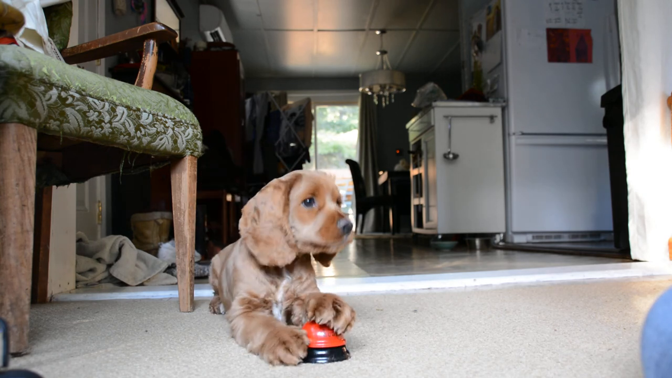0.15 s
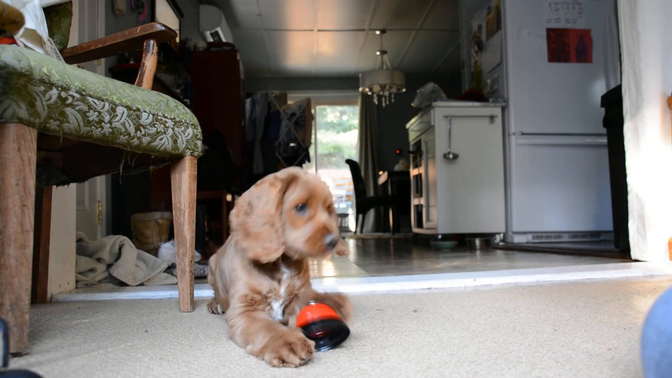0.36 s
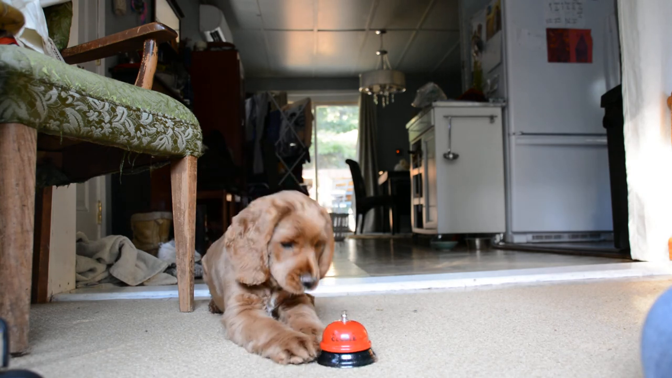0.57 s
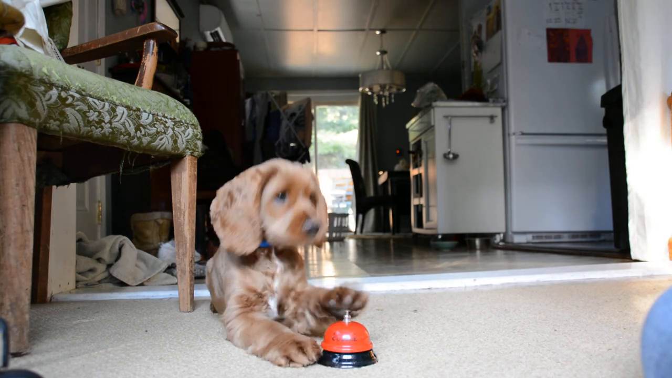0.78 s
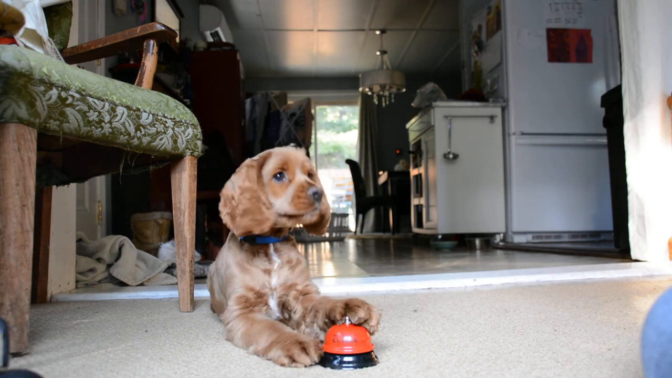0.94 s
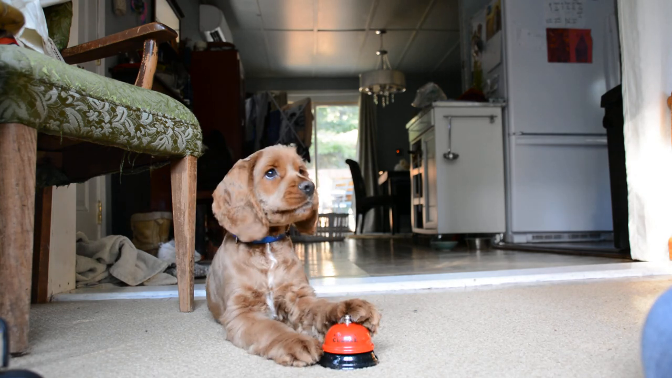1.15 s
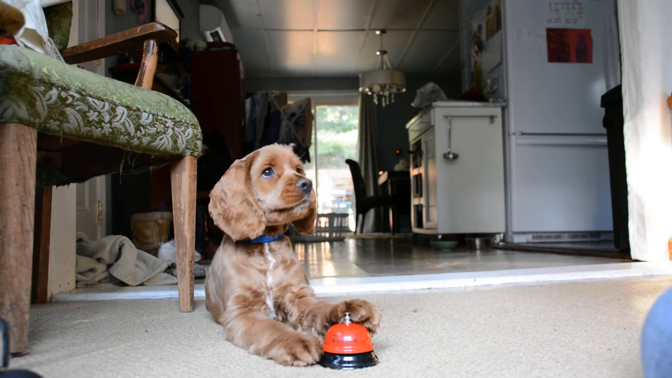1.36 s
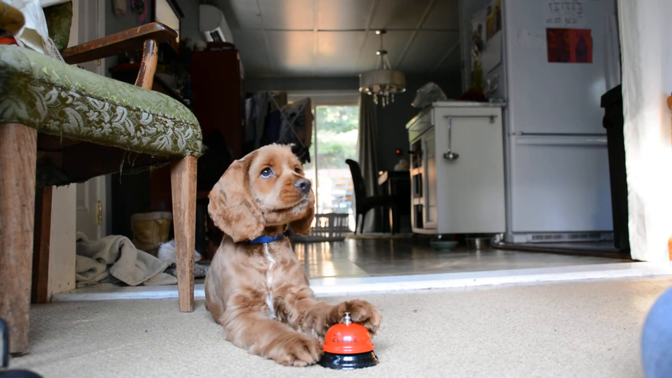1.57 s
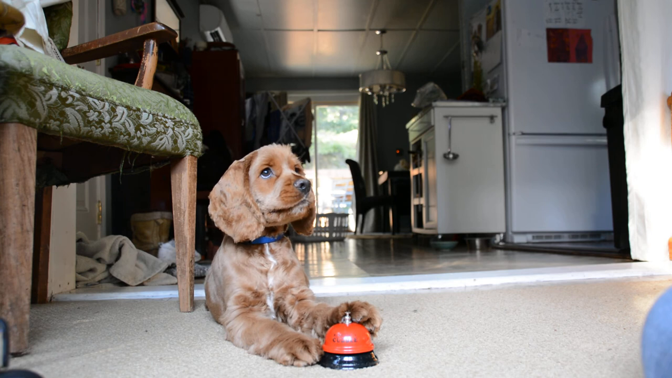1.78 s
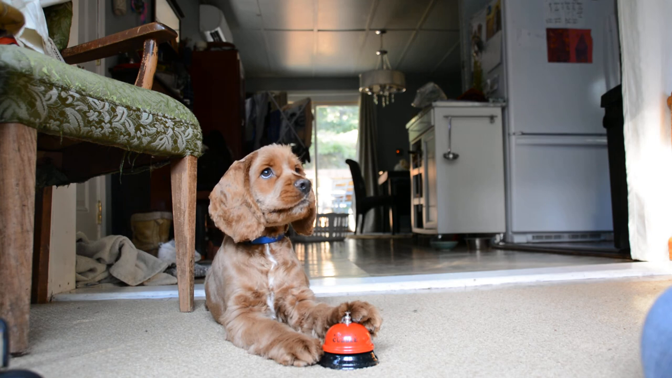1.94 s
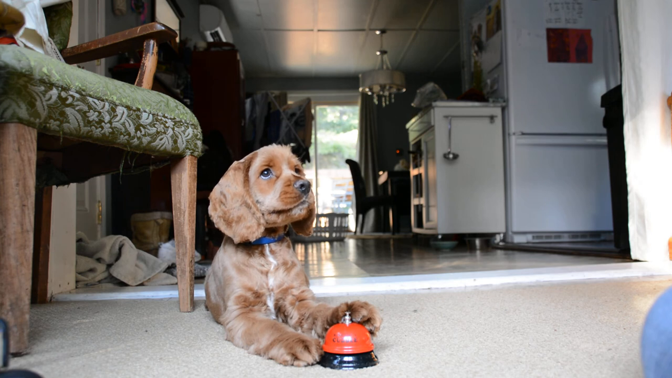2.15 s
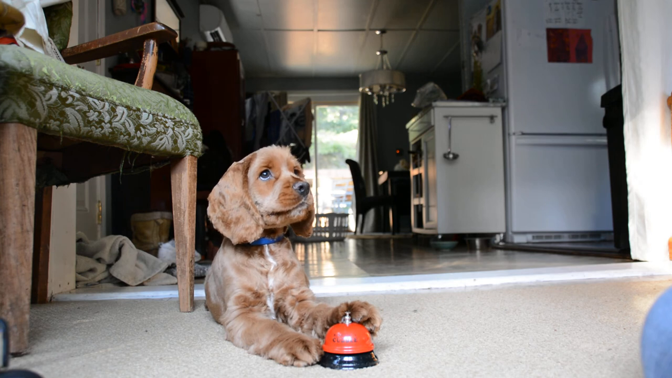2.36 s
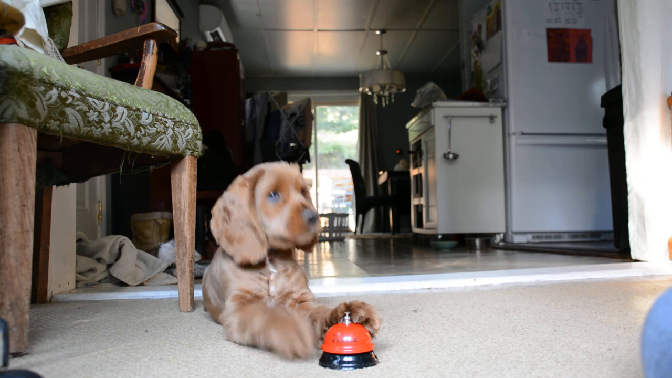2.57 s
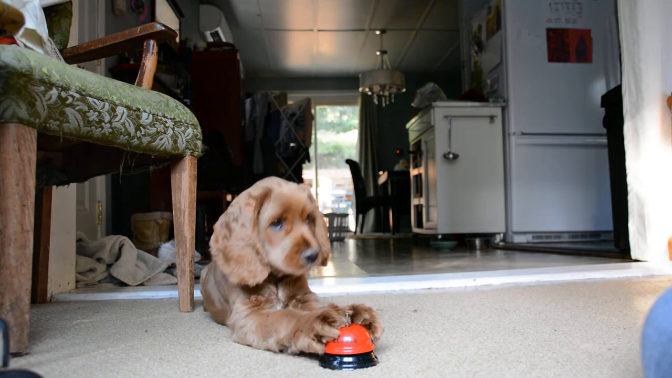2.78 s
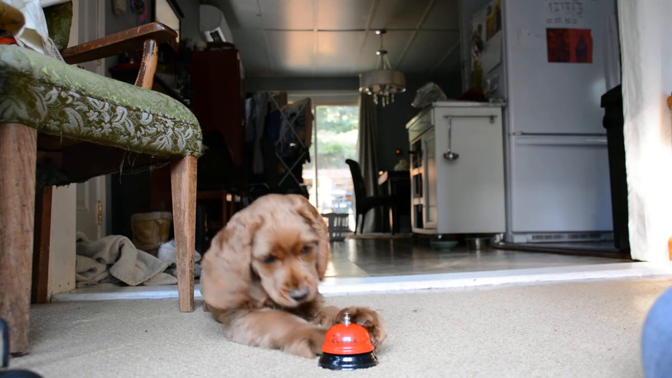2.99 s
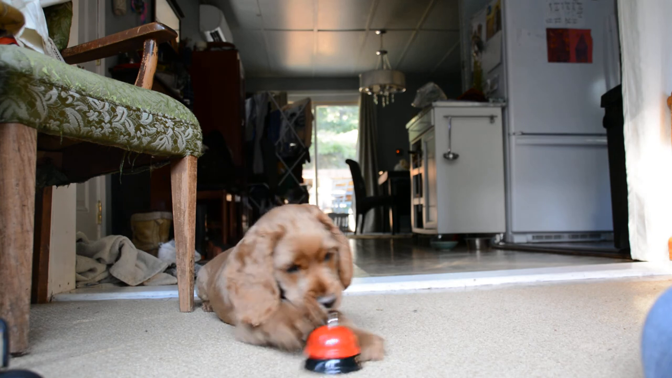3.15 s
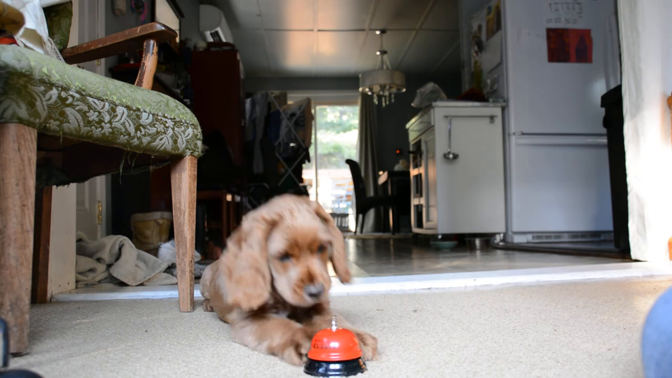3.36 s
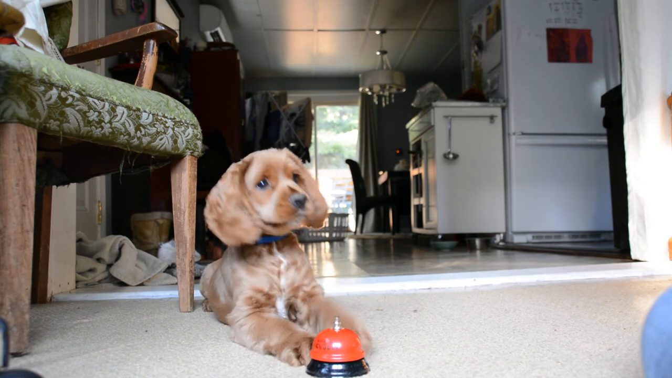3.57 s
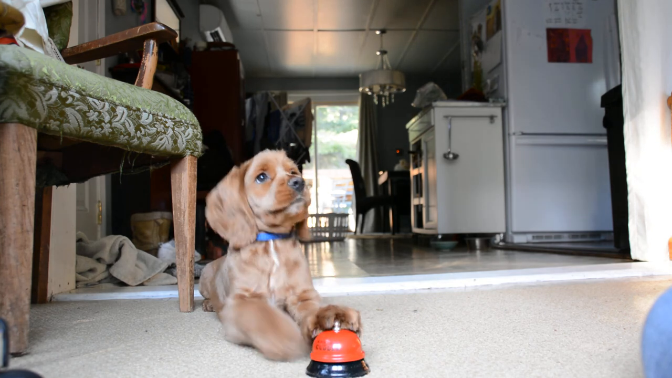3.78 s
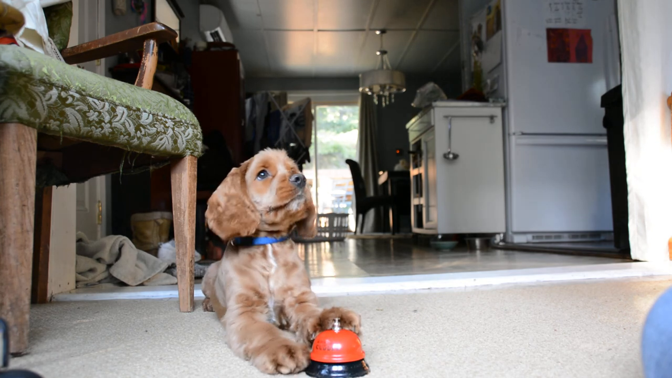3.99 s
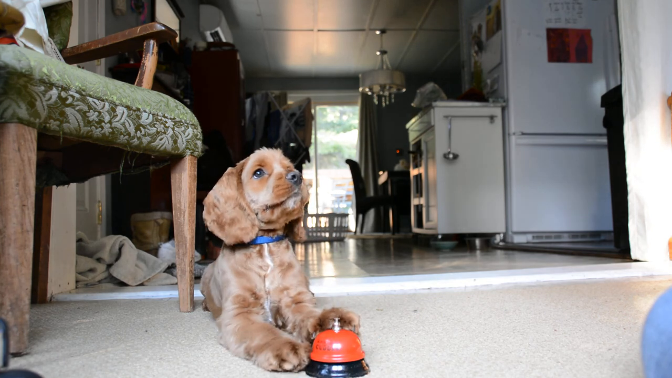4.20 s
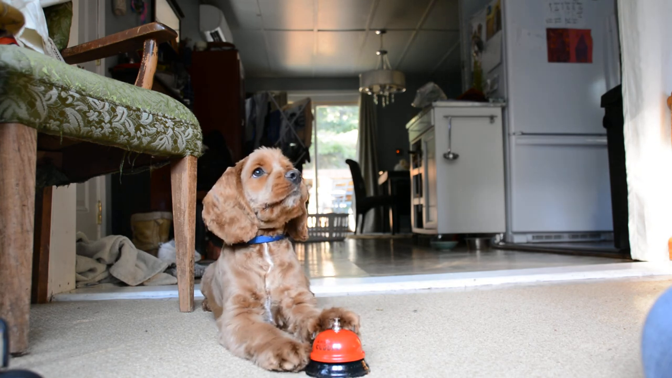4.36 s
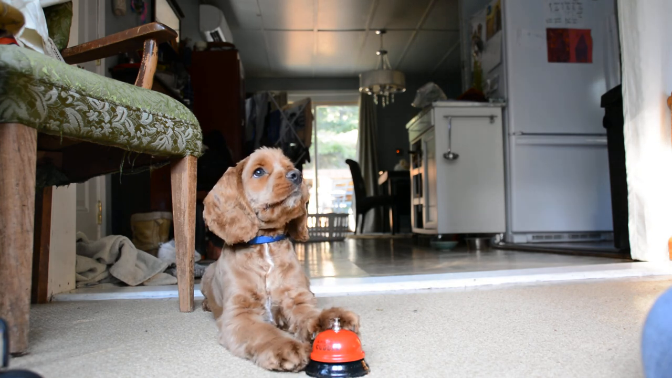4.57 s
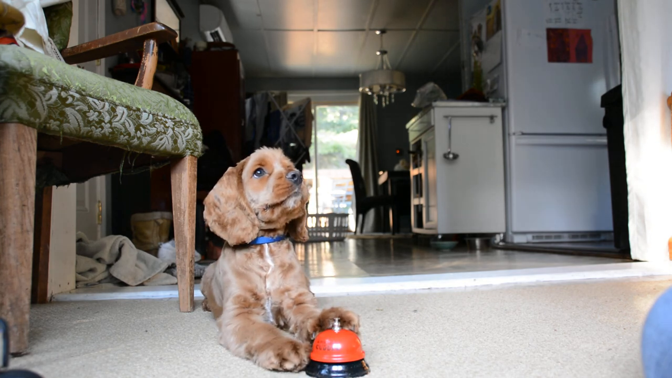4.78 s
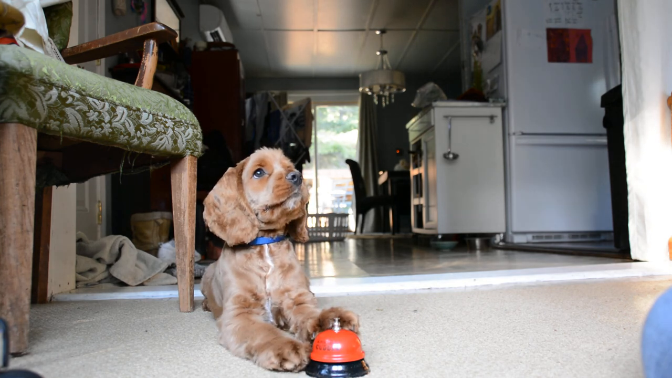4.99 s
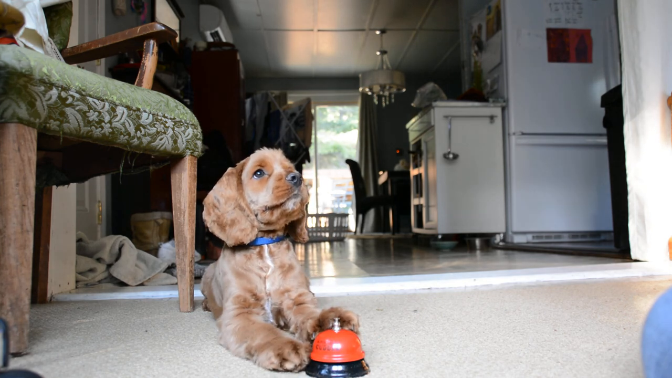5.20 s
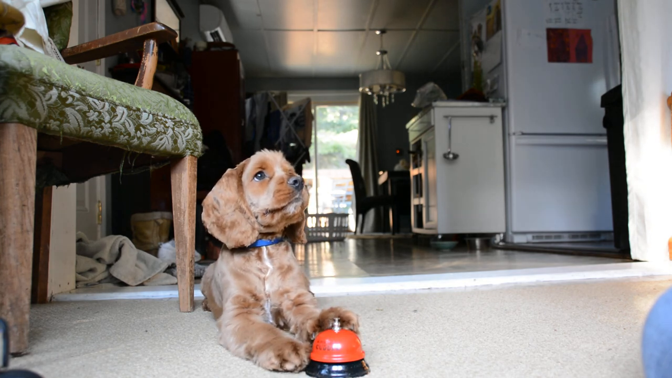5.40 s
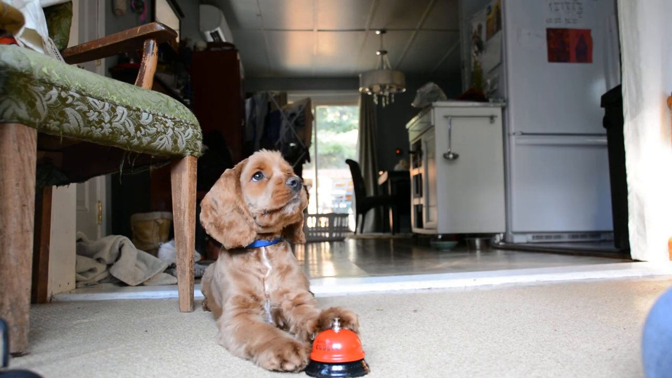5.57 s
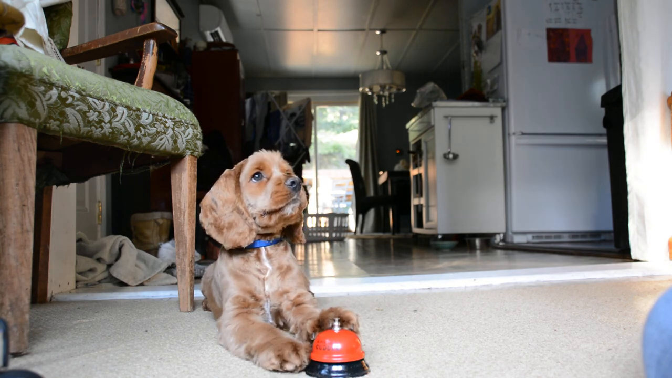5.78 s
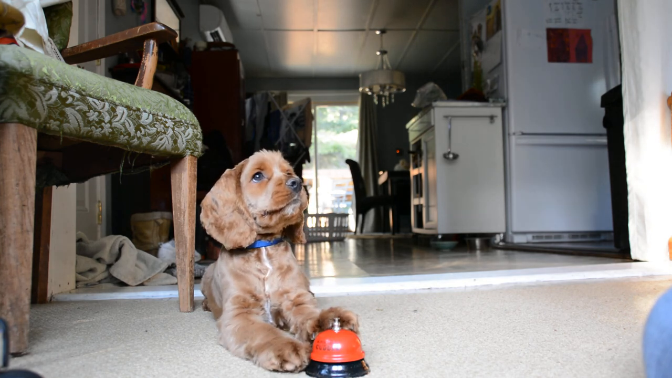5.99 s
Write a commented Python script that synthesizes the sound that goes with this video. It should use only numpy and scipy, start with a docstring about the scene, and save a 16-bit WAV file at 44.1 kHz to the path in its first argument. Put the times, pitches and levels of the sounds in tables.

```python
"""A steel desk bell on a carpet, pawed by a puppy close to the microphone: the clapper strikes short dings, pairs of
beating dome modes that the paw soon damps. Claws tap and scrape, as noise bursts through the bell's resonances
with a brushed dome and singing loose parts; the base thuds on the floor, as impulses that sweep downward.
Furniture echoes and a short room tail surround it, over steady filtered hiss and a narrow hum."""
import sys
import numpy as np
from scipy import signal
from scipy.fft import rfft, irfft, next_fast_len
from scipy.io import wavfile
from scipy.ndimage import uniform_filter1d, map_coordinates

SR = 44100
rng = np.random.default_rng(int(sys.argv[2]) if len(sys.argv) > 2 else 0)


def transcribe(u):
    """Save the signal u as a 16-bit wav file named by the first command-line argument.

    u: samples, shape (n,) or (channels, n), limited to [-1, 1]; the rate is SR.
    q: integer samples, one column per channel.
    """
    v = np.clip(np.atleast_2d(u).T, -1, 1)
    q = np.round(v * 32767).astype(np.int16)
    wavfile.write(sys.argv[1], SR, q)


N = 266343

# edges of the four bands of a contact, knock, shell, stem and treble: (f/Hz)
ZONES = [300, 2300, 3350, 5400, 16000]


def dings():
    """Each clapper blow sets the dome pairs ringing, together with a short crack and the jangle of the loose parts."""
    # clapper strikes: (t/s, crack level/dB, upper partner level/dB x5, left over right/dB,
    # t60 of the paw's damping/s, time until pressed/s)
    strikes = [(0.849, -16.5, -31, -32, -23.5, -8, -38, 1.5, 0.45, .5),
               (3.387, -36, -47.5, -43.5, -51, -43, -56, 2.5, 2.5, .335),
               (3.749, -18, -22, -21, -24, -9.5, -41, .7, 0.2, .5)]
    # per strike, strength of each pair's lower partner against the upper, set by where the rim is hit:
    # (signed ratio x5)
    partners = [(-.65, .6, -.55, .3, 8), (-.5, .45, -.1, 2, 3), (-.3, .35, 2.2, .8, 10)]
    t = np.arange(SR // 2) / SR
    bell, crack = np.zeros((2, N + SR)), np.zeros(N + SR)
    for (s, crack_db, *levels_db, pan_db, held_t60, free_s), lower in zip(strikes, partners):
        start = round(s * SR)
        blow = ring(levels_db, lower, held_t60, free_s)
        bell[:, start:start + len(t)] += amp([[pan_db / 2], [-pan_db / 2]]) * blow
        # a 10 ms crack together with a weaker 140 ms jangle
        crack[start:start + len(t)] += amp(crack_db - 60 * t / 0.01)
        crack[start:start + len(t)] += amp(crack_db - 7.5 - 60 * t / 0.14)
    # (f/Hz, relative level/dB)
    colour = [(200, -19), (1000, -1.5), (3000, -2), (3700, -1.5), (4050, -4.0), (4550, 1), (5200, -7.0),
              (7400, 0), (8500, -3.5), (10700, -0.5), (13500, -21), (16000, -21), (20000, -63.5)]
    response = lambda f: causal(amp(along(colour, f)) * (1 + 1.5 * modes(f)))
    jangle = filtered(crack[:N] * rng.standard_normal(N), response)
    return bell[:, :N] + jangle


def ring(levels_db, lower, held_t60, free_s):
    """The five pairs of the dome, dying by their own loss plus the paw's, until a press stops them."""
    # dome modes come in split pairs that beat: (lower f/Hz, upper f/Hz)
    dome = [(1072, 1087), (3051, 3084), (5945, 5981), (9427, 9466), (12875, 12918)]
    # decay of each pair with nothing touching the dome: (t60/s)
    free_t60 = [1.6, 1.78, .8, .33, 0.19]
    # the high pairs slip past the pads: (share of the paw's damping that each pair feels)
    grips = [1.01, .99, .9, .55, .3]
    t = np.arange(min(SR // 2, round((free_s + .05) * SR))) / SR
    out = 0
    for (low_hz, high_hz), t60, grip, db, share in zip(dome, free_t60, grips, levels_db, lower):
        pair = np.sin(2 * np.pi * high_hz * t) + share * np.sin(2 * np.pi * low_hz * t)
        out = out + amp(db - 60 * t * (1 / t60 + grip / held_t60)) * pair
    onset = 1 - np.exp(-t / .0015)
    press = amp(-60 * np.maximum(t - free_s, 0) / .03)
    return np.pad(out * onset * press, (0, SR // 2 - len(t)))


def contacts():
    """Taps and dragging shake the body zone by zone, thud on the floor and brush the dome."""
    shakes, tones = taps()
    scrape, treble = skids()
    thuds = floor_thuds(scrape)
    rattle = body_rattle(shakes + [scrape, scrape, scrape, treble])
    return tones + thuds + rattle


def taps():
    """Pads and claws strike: noise envelopes for the four zones, and tones of the dome and loose parts."""
    # paw and claw contacts: (t/s, pad knock level/dB, claw tick level/dB, low three dome pairs level/dB,
    # high two level/dB, both before the brush offsets, singing loose part f/Hz, its level/dB)
    hits = [(0.214, -52, -65, -90, -72, 2600, -64), (0.262, -40, -42.5, -43, -48, 3044, -55),
            (0.332, -36, -38, -39.5, -42, 2000, -53), (0.379, -48, -44, -58, -52, 4100, -45),
            (0.425, -27, -33, -45, -51, 2780, -36), (0.43, -40, -45, -60, -60, 4180, -39),
            (0.472, -58, -55, -60, -50, 7590, -47), (0.519, -40, -43, -53, -57, 1750, -54),
            (0.55, -39, -41, -51, -44, 2700, -36), (0.563, -48, -50, -57, -46, 7590, -41.5),
            (0.609, -49, -56, -70, -55, 2900, -54), (0.806, -39, -56, -65, -71, 4190, -55),
            (0.832, -42.5, -57.5, -62, -77, 3180, -58), (1.076, -52, -79.5, -69, -70, 1780, -70),
            (1.106, -48, -73, -85, -69.5, 4200, -72), (1.176, -57, -62, -79, -77, 4000, -59),
            (1.199, -42, -52, -69, -52, 3650, -43), (2.539, -53, -81, -92, -88.5, 1510, -63),
            (2.663, -55, -60, -76, -84, 4290, -58.5), (2.831, -69.5, -63, -75, -78, 4200, -69.5),
            (2.847, -57.5, -63, -75, -78, 2120, -71), (2.883, -61, -63, -72, -80, 4270, -64),
            (2.965, -57, -54, -54.5, -52.5, 9190, -67), (2.98, -33.5, -42, -55, -46, 4070, -45),
            (3.088, -45, -60, -68, -48, 1740, -66), (3.099, -40, -53, -68, -70, 4180, -47),
            (3.134, -37, -38, -56, -34.5, 3060, -47), (3.165, -36, -43, -58, -52, 2810, -33),
            (3.179, -34, -38, -59, -47, 4070, -35), (3.205, -43, -30, -28, -29, 2920, -27),
            (3.215, -56, -50, -60, -60, 4070, -33.5), (3.248, -43.5, -48, -60, -40, 4040, -31),
            (3.365, -44, -50, -57, -63, 4200, -41.5), (3.37, -50, -60, -70, -70, 2940, -41),
            (3.413, -39, -46, -58, -49, 2790, -50.5), (3.721, -42, -53, -85, -69, 1585, -48),
            (3.734, -48, -64, -87, -71, 1380, -59), (3.896, -40.5, -43.5, -78.5, -40, 3630, -39)]
    # what a brushing paw draws from each dome pair: (offset/dB)
    brush_offsets = [-13, -11.5, 0, -1, -21]
    rattle_t60, brush_t60, part_t60 = .062, .26, .21  # s; the middle one is the paw's damping of the dome
    t = np.arange(SR // 2) / SR
    shakes, tones = np.zeros((4, N + SR)), np.zeros(N + SR)
    rise = 1 - np.exp(-t / 0.001036)  # a padded paw loads the bell over a moment
    shape = (amp(-60 * t / rattle_t60) + .3 * amp(-60 * t / 0.0077)) * rise
    spots = rng.uniform(-1, 1, (len(hits), 5))
    for (s, knock_db, claw_db, low_db, high_db, part_hz, part_db), spot in zip(hits, spots):
        start = round(s * SR)
        # a knock also shakes shell and stem; a singing part rattles in its own zone
        shake = amp([knock_db, knock_db - 12, knock_db - 9.5, claw_db])
        shake[np.searchsorted(ZONES, part_hz) - 1] += amp(part_db + 1.5)
        shakes[:, start:start + len(t)] += shake[:, None] * shape
        levels_db = np.repeat([low_db, high_db], repeats=(3, 2)) + brush_offsets
        brushed = ring(levels_db, spot, brush_t60, free_s=0.11)
        # the part beats at its own random rate, up to 30 Hz
        beat = 1 + .5 * np.cos(2 * np.pi * 30 * spot[0] * t)
        part = amp(part_db - 60 * t / part_t60) * rise * np.sin(2 * np.pi * part_hz * t) * beat
        tones[start:start + len(t)] += brushed + part
    return shakes[:, :N], tones[:N]


def skids():
    """The paw drags the bell: scrape and treble envelopes swell and fade exponentially about each peak."""
    # drags: (t of most pressure/s, scrape level/dB, its treble over that/dB,
    # time to swell by 20 dB/s, time to fade by 20 dB/s)
    drags = [(0.29, -63, -1, 0.12, 0.07), (0.395, -46.5, -1.5, 0.0937, 0.05),
             (0.44, -40.5, -1.5, 0.0238, 0.0849), (0.495, -53.5, 3, 0.05, 0.07),
             (0.565, -42, -1.5, .025, 0.08), (0.82, -55, -11, .03, 0.07), (1.215, -60, 5, 0.07, 0.01),
             (2.87, -67, 1.5, .05, .05), (2.999, -41, -2, 0.0328, 0.05), (3.199, -40, -2, .085, 0.1054),
             (3.275, -45.5, -1, 0.0635, 0.0559), (3.395, -45, -3, 0.0563, 0.0861),
             (3.915, -48.5, 0, 0.06, 0.05)]
    time = np.arange(N) / SR
    envelopes = np.zeros((2, N))
    for s, db, treble_db, swell, fade in drags:
        slope = 20 * np.maximum((s - time) / swell, (time - s) / fade)
        envelopes += amp([[db], [db + treble_db]] - slope)
    return envelopes


def floor_thuds(scrape):
    """Base drops, as impulses, and a dragged base, as noise, excite the carpeted floor."""
    # the base drops on the floor: (t/s, thud level/dB)
    drops = [(0.262, -35.5), (0.379, -31), (0.423, -24), (0.547, -12), (0.822, -17), (1.1, -33),
             (1.135, -38), (2.665, -28.5), (2.85, -31), (2.977, -17), (3.09, -20), (3.135, -24),
             (3.19, -18.5), (3.368, -19.5), (3.4, -23), (3.734, -20.5), (3.897, -10), (3.918, -11)]
    # broad response of the carpet: (f/Hz, relative level per Hz/dB)
    carpet = [(30, -35.5), (55, -17), (85, -4.5), (105, -5), (130, -8), (300, -3.5), (450, -19.5),
              (700, -7), (1000, -29), (2000, -120)]
    impulses = np.zeros(N)
    for s, db in drops:
        impulses[round(s * SR)] = amp(db)
    rumble = amp(-15) * scrape * rng.standard_normal(N)
    # lowest mode of the floor boards: 88 Hz, 25 Hz wide
    boom = lambda f: amp(3) * 25 * f / abs(88 ** 2 - f * f + 25j * f)
    # bending waves: high frequencies travel faster, so a thud sweeps downward
    sweep = lambda f: np.exp(-4j * np.pi * 0.0977 * np.sqrt(f))
    floor = lambda f: causal(amp(along(carpet, f)) + boom(f)) * sweep(f)
    return filtered(impulses + rumble, floor)


def body_rattle(force):
    """Slipping noise under the four zone envelopes passes the body's resonances, which come and go."""
    # broad part of a contact: (f/Hz, relative level per Hz/dB, before a common offset)
    grit = [(180, -56), (300, -7), (1210, 2.5), (2390, -5.5), (4120, -7), (5380, -19), (5840, -6.5),
            (9610, -0.5), (15000, -33), (15800, -41.5)]

    def zoned(f):
        body = modes(f) + amp(along(grit, f) - 17.5)
        responses = []
        for low_hz, high_hz in zip(ZONES[:-1], ZONES[1:]):
            band = 1 / (1 + (low_hz / (f + 1)) ** 8) / (1 + (f / high_hz) ** 8)
            responses.append(causal(body * band))
        return np.array(responses)

    slips = grains(spiky_db=2.6, clumps_db=2.2)
    return shifting(filtered(force * slips, zoned).sum(0), depth_db=3.1)


def modes(f):
    """Summed magnitudes of the resonances of plunger, base and held shell."""
    # resonances: (f/Hz, width/Hz, relative level/dB)
    body = [(640, 60, -15), (1091, 60.4, -4), (1625, 210, -6.5), (2130, 150, -20), (2619, 40, 3.5),
            (2903, 40, 6.5), (2940, 40, 3.5), (3352, 56, -1.5), (3650, 30, -4), (4070, 45, -3.5),
            (4200, 68, -3), (4570, 55, -4), (5300, 50, -12), (5970, 40, -8), (6650, 110, -10.5),
            (7595, 31, -11.5), (9200, 60, -15.5), (9430, 50, -1.5), (10820, 110, -6), (12900, 60, -22),
            (14800, 150, -24)]
    return sum(amp(db) * w * f / abs(c * c - f * f + 1j * f * w) for c, w, db in body)


def grains(spiky_db, clumps_db):
    """Noise in uneven clumps, its samples differing widely in size: slips of a claw."""
    # clump levels drift between 120 random points a second
    clumps = map_coordinates(rng.standard_normal(N // 200), [np.arange(N) * 120 / SR])
    level_db = spiky_db * rng.exponential(size=N) + clumps_db * clumps
    return unit(rng.standard_normal(N) * amp(level_db))


def shifting(x, depth_db):
    """The grip keeps changing, so resonances come and go: random gain in patches of frequency and time."""
    z = signal.stft(x, nperseg=128)[2]
    field = uniform_filter1d(rng.standard_normal(z.shape), size=2, axis=0)
    field = uniform_filter1d(field, size=20, axis=1)
    return signal.istft(z * amp(depth_db * unit(field)), nperseg=128)[1][:N]


def near_echoes(x, level_db):
    """Chair legs and furniture send back six copies, each reaching the two microphone ports a hair apart."""
    delay = rng.uniform(.001, .025, 6)  # s
    skew = rng.uniform(-0.000027, 3e-5, 6)  # s
    sign = rng.choice([-1, 1], 6)

    def paths(f):
        return np.array([sum(g * np.exp(-2j * np.pi * f * (d + ear * k)) for d, k, g in zip(delay, skew, sign))
                         for ear in (1, -1)])

    return amp(level_db) * filtered(x, paths)


def room(x):
    """A decaying noise tail, nearly the same at both microphone ports except in the treble."""
    # reverberation: (f/Hz, t60/s)
    decay = [(100, .5), (700, 0.27), (3000, .27), (12000, 0.27)]
    hz, t, z = signal.stft(rng.standard_normal((2, SR // 2)), SR, nperseg=256)
    z = z * amp(-60 * t / along(decay, hz)[:, None])
    # side against mid: (f/Hz, level/dB)
    z[1] *= amp(along([(300, -44.5), (1500, -33), (12000, 2.0)], hz))[:, None]
    mid, side = signal.istft(z, SR, nperseg=256)[1]
    tail = np.array([mid + side, mid - side]) / np.linalg.norm(mid)
    late = np.pad(x, (200, 0))  # samples before the tail starts
    return signal.fftconvolve(late[None], tail, axes=1)[:, :N]


def room_tone():
    """Gently wavering hiss, alike in the bass on both sides, with an appliance's hum as narrow-band noise."""
    # hiss: (f/Hz, relative level per Hz/dB)
    air = [(15, -45), (25, -17.5), (64, -16.5), (87, -11.5), (229, -10), (270, -9.5), (301, -8.5),
           (427, -10), (591, -5.5), (641, -7), (695, -6.5), (2350, -12.5), (10400, -28.5), (16000, -40)]
    # left-right likeness of the hiss: (f/Hz, correlation)
    alike = [(60, 1), (180, 0.65), (550, 0.48), (1650, 0.2), (4970, 0.11), (15000, 0.13)]

    def mid_side(hz):
        turn = np.arccos(np.clip(along(alike, hz), -1, 1)) / 2
        return amp(along(air, hz)) * np.array([np.cos(turn), np.sin(turn)])

    mid, side = filtered(rng.standard_normal((2, N)), mid_side)
    hiss = unit(np.array([mid + side, mid - side]))
    hum = filtered(rng.standard_normal(N), lambda hz: 1 / (1 + ((hz - 602) / 5) ** 2))
    # the hiss level drifts between five random points a second
    swell = amp(0.39 * map_coordinates(rng.standard_normal(40), [np.arange(N) * 5 / SR]))
    return amp(-57) * swell * hiss + amp(-69) * unit(hum)


def amp(db):
    """Amplitude of a level in dB."""
    return 10 ** (np.asarray(db) / 20)


def unit(x):
    """x scaled to an RMS of 1."""
    return x / np.sqrt(np.mean(x ** 2) + 1e-20)


def along(points, hz):
    """Interpolates (f/Hz, value) points on a log frequency axis."""
    f, v = np.transpose(points)
    return np.interp(np.log(hz + 1), np.log(f + 1), v)


def filtered(x, response):
    """x times a complex response of frequency."""
    m = next_fast_len(N + SR // 2)
    return irfft(rfft(x, m) * response(np.fft.rfftfreq(m, 1 / SR)), m)[..., :N]


def causal(gain):
    """Minimum-phase response of energy 1 in the shape of this magnitude, by folding its cepstrum."""
    c = irfft(np.log(gain + 1e-5))
    c[1:len(c) // 2] *= 2
    c[len(c) // 2 + 1:] = 0
    return np.exp(rfft(c)) / np.sqrt(np.mean(gain ** 2))


def scene():
    """Direct bell and paws, their near echoes, the room's tail and the room tone."""
    bell, paws = dings(), contacts()
    bell_mono = bell.mean(0)
    near = near_echoes(bell_mono, level_db=-15.5) + near_echoes(paws, level_db=-14.5)
    tail = room(amp(-15) * bell_mono + amp(-7.5) * paws)
    return bell + paws + near + tail + room_tone()


def record(dry):
    """The microphone drops the deepest bass; the camera keeps nothing above its band limit."""
    top_hz, bass_hz = 16000, 35
    return filtered(dry, lambda hz: (hz < top_hz) / (1 + (bass_hz / (hz + 1)) ** 4))


dry = scene()
out = record(dry)
transcribe(out)
```